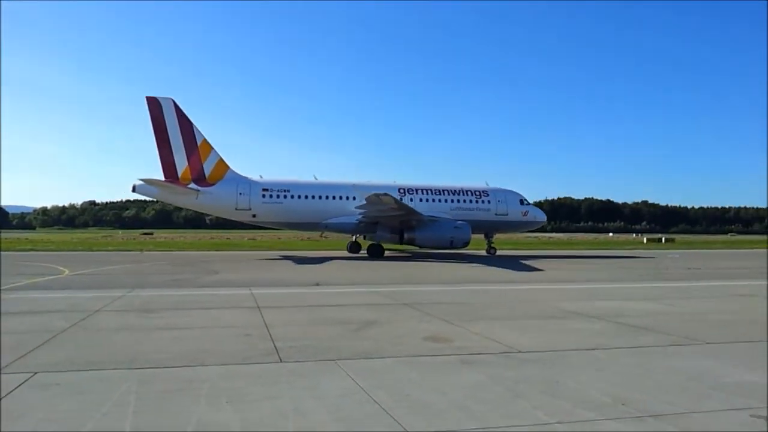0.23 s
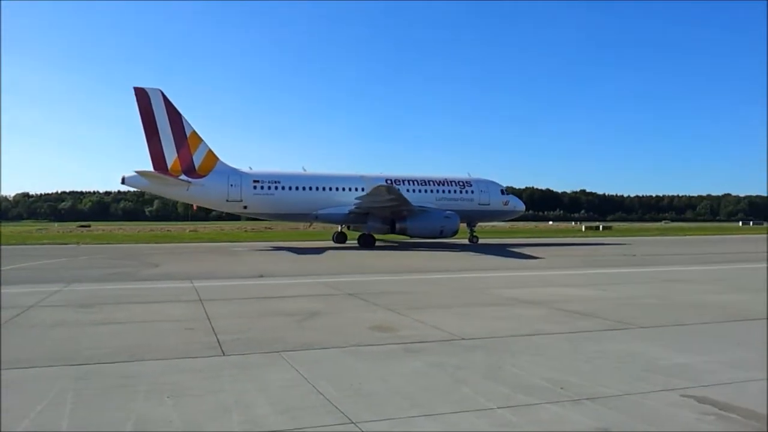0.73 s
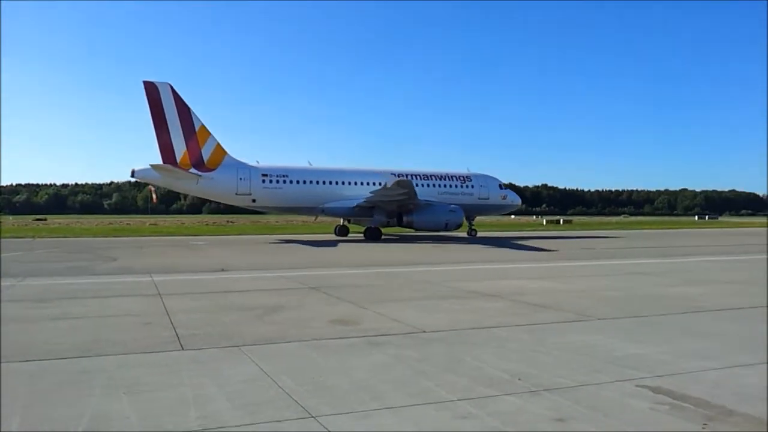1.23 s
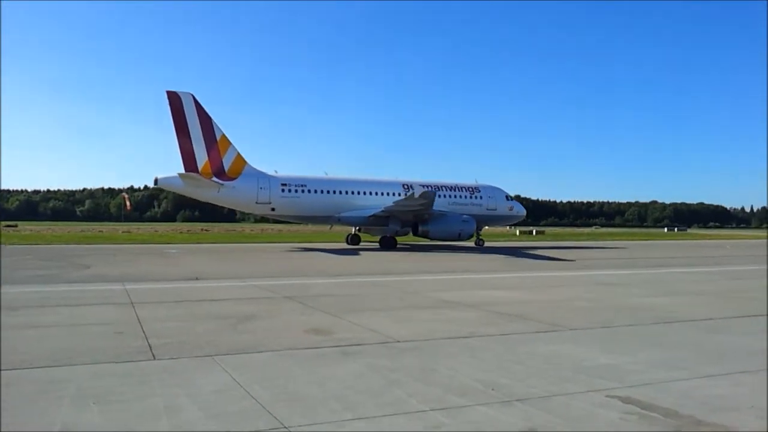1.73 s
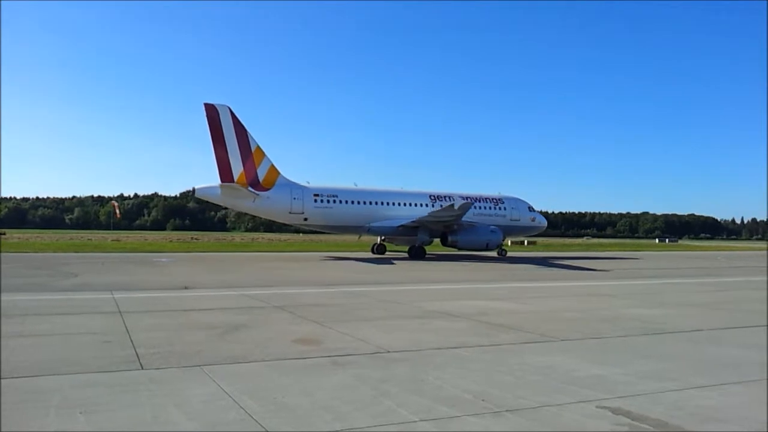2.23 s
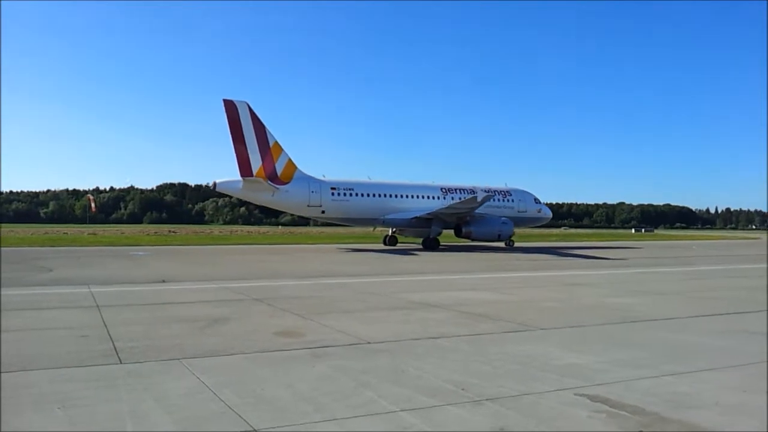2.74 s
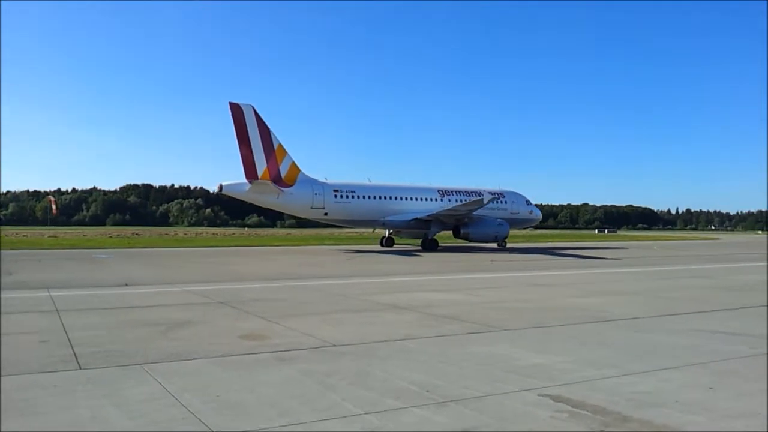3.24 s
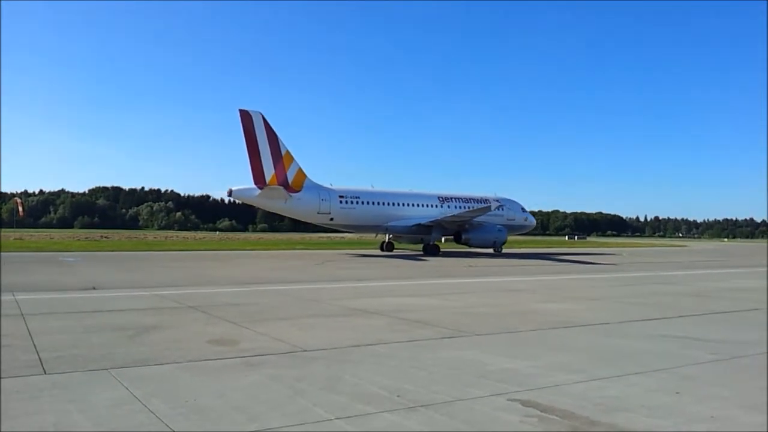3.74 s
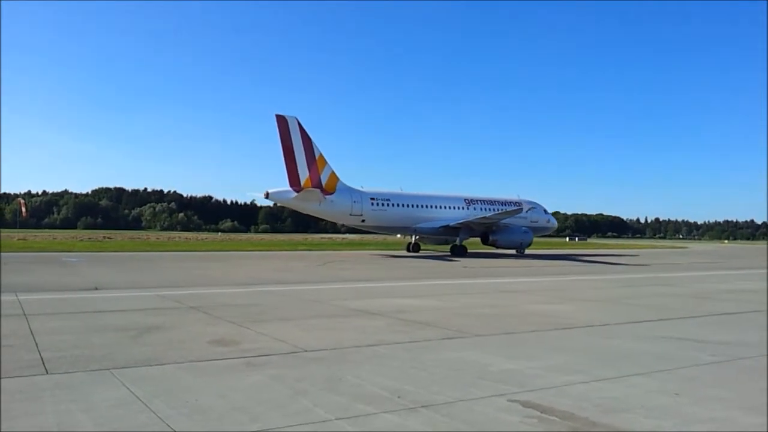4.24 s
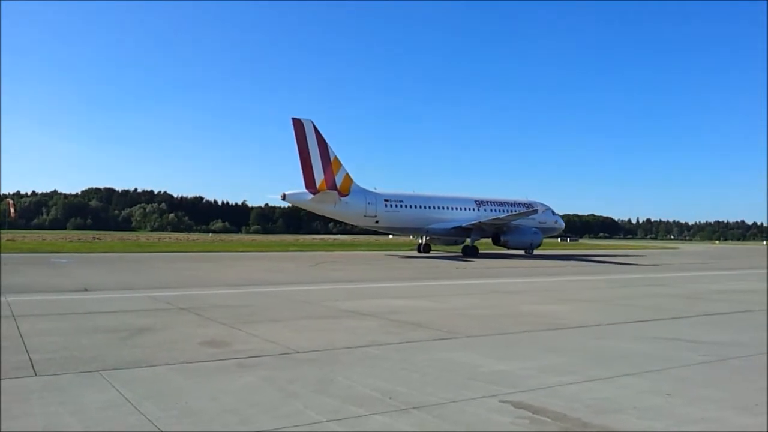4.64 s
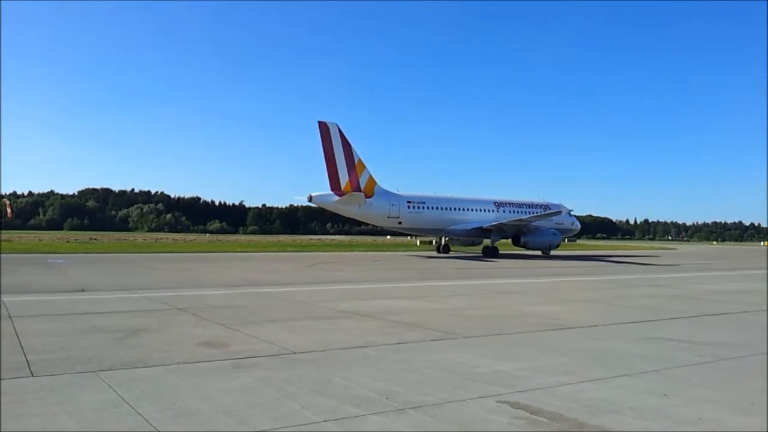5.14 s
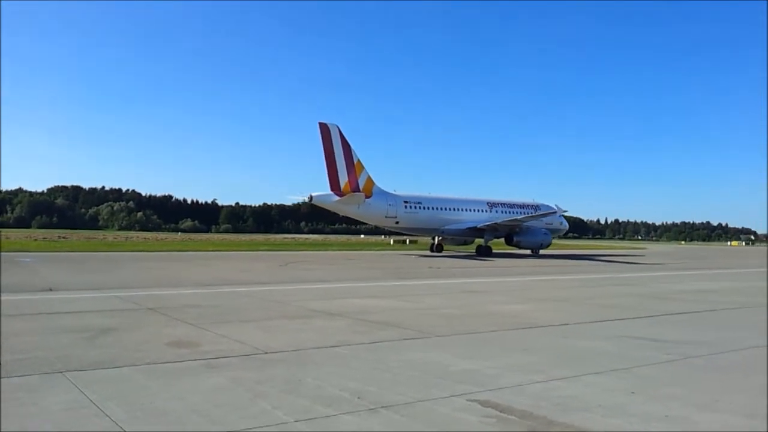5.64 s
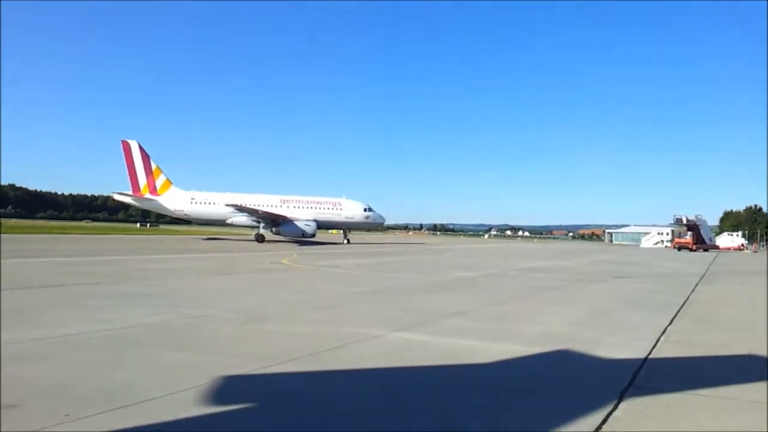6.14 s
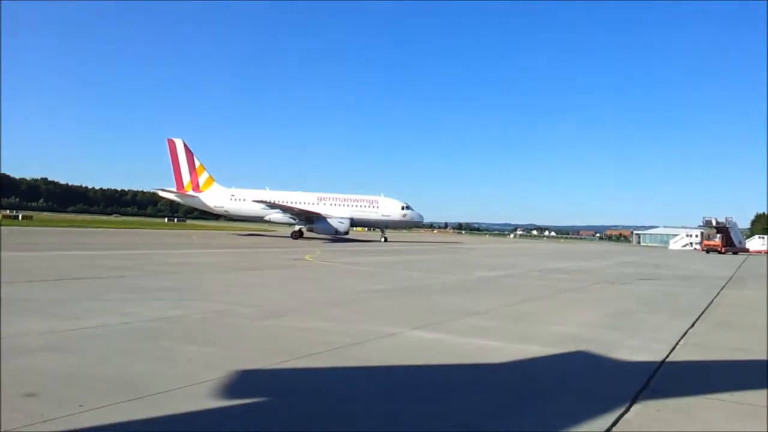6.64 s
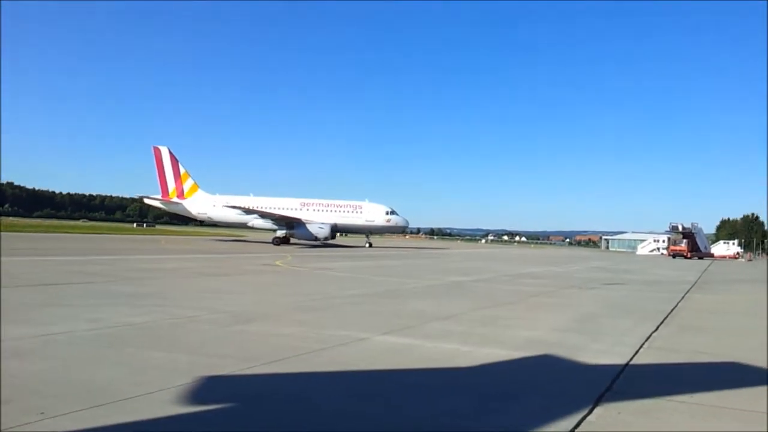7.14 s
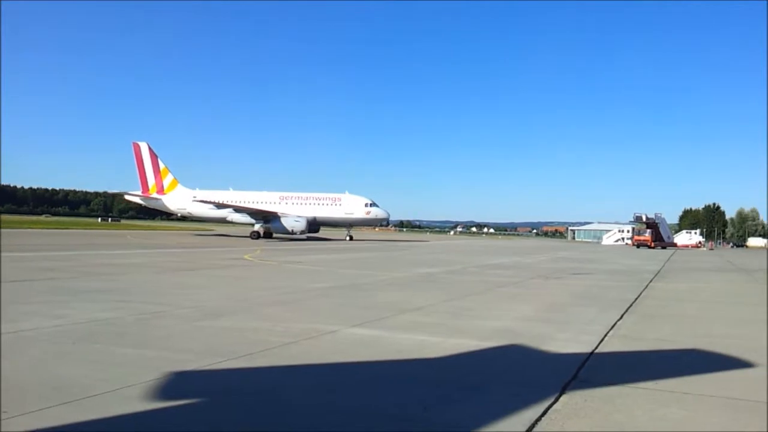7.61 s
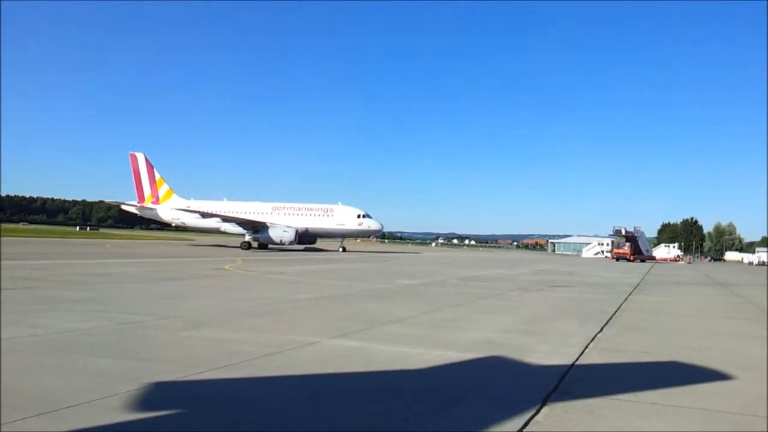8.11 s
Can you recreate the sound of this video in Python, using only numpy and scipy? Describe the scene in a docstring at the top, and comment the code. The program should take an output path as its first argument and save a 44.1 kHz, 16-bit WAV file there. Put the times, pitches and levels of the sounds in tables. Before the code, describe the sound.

A taxiing airliner's jet engines rush and whine steadily across an open apron, then abruptly turn darker and less hissy from a new standpoint.

```python
"""Twin jet engines of a taxiing airliner, heard over an open concrete apron from abeam, then from further ahead.
Exhaust roar, fan rush and intake hiss are shaped noise that wavers in the moving air.
Ducts hum and blade rows whine as partly scattered tones, whose levels follow passing lobes.
Slow pitch changes follow shaft speed and Doppler shift; the standpoint switches once, at 5.753 s."""
import sys
import numpy as np
from scipy import signal
from scipy.io import wavfile
from scipy.ndimage import map_coordinates

SR = 44100
rng = np.random.default_rng(int(sys.argv[2]) if len(sys.argv) > 2 else 0)


def inscribe(sig):
    """Save sig as 16-bit PCM at rate SR to the path in sys.argv[1].

    A 1-D sig is mono; a 2-D sig holds one channel per row.
    Samples are clipped to [-1, 1] before scaling.
    """
    pcm = np.round(np.clip(np.atleast_2d(sig).T, -1, 1) * 32767)
    wavfile.write(sys.argv[1], SR, pcm.astype(np.int16))


N = 369116

SWITCH_S = 5.753  # from abeam before, from ahead after
TOP_HZ = 12200
FRAME = 1024  # samples

# All length_s columns below: full width of a Gaussian swell at 1/e of its height.
# Basic noise spectrum of the engines: frequency_hz, density_db_per_hz, left_minus_right_db, ear_likeness_0_to_1
NEAR_RUSH = [(30, -86, 5.9, 0.55), (90, -68, 1, 0.4), (143, -50, 6.5, 0.93), (418, -48.5, -1, 0.79),
             (750, -47.5, 0.5, 0.86), (860, -54, -1.5, 0.16), (1274, -50, 6, 0.35), (1357, -56.5, 3.5, 0),
             (1826, -50, 8, 0.46), (1990, -54, 3.5, 0), (2480, -54.5, 1.5, 0.07), (3400, -57.5, 1, 0),
             (4330, -54, -1.5, 0.12), (5900, -55, 2.5, 0.36), (7040, -52, 0.5, 0.52),
             (8640, -59.5, -5, 0.03), (10340, -68, -9.5, 0), (11410, -80, -21, 0.1),
             (12600, -108, -22, 0.2)]
FAR_RUSH = [(30, -92, 5, 0.55), (91, -68, 9, 0.69), (171, -48.5, 1, 0.82), (390, -48.5, 3.5, 0.32),
            (600, -52, -1.5, 0.62), (970, -53, 2.5, 0.35), (1050, -62, 0, 0.15), (1230, -58, 1, 0.3),
            (1670, -59.5, 3.5, 0.75), (1980, -57, -1, 0.36), (2430, -63, -3, 0.33), (2880, -62.5, -5, 0.26),
            (4000, -65, 3, 0.091), (4540, -63, 8, 0.25), (5780, -62, -6, 0.31), (7650, -66, -1.5, 0.22),
            (9200, -75.5, -12.5, 0.25), (10110, -76, 0, 0.15), (10860, -107, 0, 0.1)]
# Steady trends of the rush from abeam as the aircraft rolls on, counted from MIDWAY_S
MIDWAY_S = 2.57
ROAR_DB_PER_S, FAN_DB_PER_S, HISS_PAN_DB_PER_S = 0.1, 0.5, -0.07
TOP_DB_PER_S = -1.3  # full slope above 10.5 kHz
# Beamed hiss whose lobe sweeps past once: peak_s, length_s, gain_db
HISS_LOBE = (2.43, 1.6, 1.15)
# Gusts and lulls in the rush: peak_s, length_s, roar_gain_db, fan_gain_db, hiss_gain_db
GUSTS = [(1.306, 0.38, 1.5, -0.7, 1.2), (2.23, 0.27, 1.7, 0, 1.5), (3.562, 0.21, 2.5, -0.5, 0.3),
         (3.9, 0.3, 1, 0.5, 0.5), (4.36, 0.2, 0, 1, 0), (5.223, 0.14, 0, 1.8, 0),
         (5.37, 0.16, -1.5, -0.5, -0.5), (5.53, 0.22, 0, -1.3, 0), (5.725, 0.07, 0, 1.8, -1),
         (6.118, 0.15, 1.5, -0.2, 1), (6.25, 0.06, -2.5, -3, 0), (6.463, 0.17, -4.5, -4.5, -3),
         (6.552, 0.056, 3, 2.5, 1), (6.672, 0.24, -2, -3.5, -3), (7.05, 0.33, 1.9, 0, 0.7),
         (7.22, 0.08, -2, -1.5, -0.5), (7.31, 0.07, 1.6, 0.4, 0.3), (7.41, 0.087, -1.5, -2.5, -1.5),
         (7.48, 0.08, 2, 1, 0.3), (7.62, 0.09, -1.5, 0.5, 0.2), (7.93, 0.31, 1, 1.5, 0.8),
         (8.09, 0.14, -0.5, 0.4, 0.9), (8.26, 0.24, -3, 0.5, -0.5)]
# Random waver of the whole rush: scale in dB above 5 kHz, less below
NEAR_WAVER_DB, FAR_WAVER_DB = .45, .7
# Initial excess of fan rush and hiss from ahead, and its decay time constant
BRIGHT_FAN_DB, BRIGHT_HISS_DB, BRIGHT_S = 2.5, 6, 0.52
# Drift of the hiss between the ears from ahead: time_s, left_minus_right_db
HISS_DRIFT = [(5.8, -1.5), (6.27, 1), (6.68, -3), (7.2, -2.5), (7.7, -0.5), (8.35, 0)]
# Dips and crests sliding through the hiss: start_hz, slide_hz_per_s, width_hz, gain_db
NEAR_RIPPLES = [(2900, -26, 210, -1), (3560, 0, 220, -1.1), (5800, -48, 280, -2), (6280, -32, 200, -0.7),
                (7540, 90, 550, 0.5), (8720, -25, 400, -1.5)]
FAR_RIPPLES = [(4100, 70, 290, 1), (6130, 45, 220, -3.5), (7400, -560, 850, 1.5), (8600, -660, 1100, -3)]
# Bearing of the engines: time_s, left_ear_lag_ms
BEARING = [(0, .22), (1.5, .225), (2.3, .19), (3.2, .165), (4.5, .135), (5.74, .125), (5.77, .23),
           (6.4, .15), (8.37, .143)]
# Brief narrowing of the hiss to the centre: start_s, end_s, depth_0_to_1
NARROWINGS = [(.14, .76, .9), (2.56, 2.87, .8), (3.15, 3.46, .35)]
# Main tones, in the order of TONE_LEVELS: pitch_hz, nominal_width_hz, steady_power_share_0_to_1,
# ear_likeness_0_to_1, abeam_left_minus_right_db, ahead_left_minus_right_db
VOICES = [(155.8, 11, .87, .95, 3, 3), (266.8, 14, .8, .95, 1.5, 1.5), (375.5, 9, .97, .93, 1, 1),
          (1204, 34, .8, .8, 4, 1), (1876, 14, .75, .6, 5.5, 0), (1920, 20, .87, .7, 9.5, -1),
          (2141, 20, .76, .7, 2, -1), (2184.5, 20, .78, .7, 1, -2)]
# Resting levels before the common gain, by tone name: abeam_level_db, ahead_level_db
TONE_LEVELS = {"drone": (-30.5, -38.5), "middle hum": (-29.5, -48), "hum": (-32.5, -32),
               "howl": (-31, -45.5), "side whine": (-39, -57), "first whine": (-35, -34),
               "second whine": (-34.5, -43), "third whine": (-32.5, -33.5)}
# Lobes and gaps of the main tones sweeping past: tone_name, peak_s, length_s, gain_db
LOBES = [("drone", 0.23, 0.44, -5), ("drone", 0.72, 0.3, 3), ("drone", 3.3, 3.3, 3.6),
         ("drone", 6.55, 0.14, 9), ("drone", 7.3, 0.7, 6.9), ("middle hum", 2.42, 0.32, 2.3),
         ("hum", 1.26, 0.27, 9.1), ("hum", 1.88, 0.35, 11.5), ("hum", 2.86, 0.23, 9.4),
         ("hum", 4.12, 1.05, 6.3), ("hum", 5.6, 0.21, 4.3), ("hum", 6.3, 0.23, 7), ("hum", 6.9, 0.51, 8.9),
         ("hum", 7.42, 0.46, 10), ("hum", 7.91, 0.59, 11.3), ("howl", 1.4, 0.17, -5),
         ("howl", 2.23, 1.4, 6.7), ("howl", 3.12, 0.27, 2.7), ("howl", 3.36, 0.2, 7.7),
         ("howl", 3.55, 0.1, -3), ("howl", 3.5, 0.2, 5), ("howl", 4.03, 0.15, 3), ("howl", 4.53, 1.6, 8.3),
         ("howl", 5.17, 0.38, 5.3), ("howl", 5.43, 0.2, -2.5), ("howl", 5.72, 0.16, 7.2),
         ("side whine", 0.75, 1.1, 13), ("side whine", 1.77, 1.4, 10), ("first whine", 0.41, 1.55, 13.5),
         ("first whine", 1.53, 1.15, 12), ("first whine", 2.1, 0.4, 5), ("first whine", 2.45, 0.26, 8.4),
         ("first whine", 3.1, 0.7, 8.3), ("first whine", 4.48, 0.18, 8), ("first whine", 6.22, 0.29, 8.2),
         ("first whine", 6.98, 0.37, 5), ("first whine", 7.5, 0.3, 4.5), ("first whine", 7.87, 0.25, 3.5),
         ("second whine", 0.39, 1.3, 11.4), ("second whine", 1.17, 0.21, 5),
         ("second whine", 2.9, 0.5, 4.5), ("second whine", 4.7, 1.1, 9.8), ("second whine", 6.7, 1.2, 11),
         ("third whine", 2.1, 0.3, 4.9), ("third whine", 3.16, 1.3, 5.6), ("third whine", 6.13, 0.26, 8.5),
         ("third whine", 6.6, 0.4, 2.5), ("third whine", 8.2, 0.4, 2)]
# Slow level beat of the two engines from abeam, by tone name: peak_s, period_s, swing_either_way_db
BEATS = {"drone": (3.09, 1.4, 3.2)}
# Random pitch jitter of the howl: scale_hz, random_knots_per_s
HOWL_WANDER = (8, 21)
# Random level twinkle of the main tones: scale in dB at 2 kHz, proportional to frequency; knots per s
NEAR_TWINKLE_DB, FAR_TWINKLE_DB, TWINKLE_RATE = 1.1, 2.2, 15
# Heard pitch, from shaft speed and Doppler shift: time_s, first_whine_hz
PITCH = [(0, 1927), (.5, 1922), (1.1, 1919), (2.4, 1916), (4.2, 1913.5), (5.74, 1915), (5.76, 1927),
         (6.6, 1929), (8.37, 1930)]
WHINE_HZ = 1920  # reference for all pitches
# Upper side line beating with the first whine: pitch_hz, level_relative_to_whine_db
SIDE_LINES = [(1964, -15)]
# Compressor whistles beamed from the intakes as the aircraft turns: peak_s, length_s, pitch_hz, level_db, width_hz
WHISTLES = [(3.2, 1.2, 4350, -40, 10), (4.6, 2.5, 2735, -41, 20), (4.1, 3.4, 3176, -39, 4),
            (4.4, 2.2, 4828, -40, 5), (4.7, 1.6, 5796, -37, 4), (3.9, 2.6, 5915, -38, 4),
            (7.3, .6, 1482, -41, 30), (7.55, .7, 2568, -43, 12), (7.1, .6, 6540, -45, 30),
            (7.6, .9, 5490, -45, 30), (7.9, .9, 4860, -45, 30)]
# Swells of duct notes: peak_s, length_s, pitch_hz, level_db
SURGES = [(4.676, 0.63, 487, -31.5), (5.194, 0.11, 402.4, -24.5), (5.69, 0.1, 493, -20.5)]
# Weaker duct and blade lines, before their common gain: pitch_hz, level_db, nominal_width_hz
NEAR_LINES = [(110, -49, 6), (197, -40, 6), (436, -38, 8), (800, -40, 10), (4828, -42, 30), (6304, -44, 25)]
FAR_LINES = [(107.5, -46, 3), (197, -41, 4), (217, -39, 4), (263.5, -30.5, 5), (312.5, -33.5, 4),
             (486, -39, 8), (750, -41, 5), (1131, -45, 10), (1455, -45, 25), (1490, -45, 25),
             (2568, -43, 12), (2730, -47, 20), (4752, -49, 8), (4842, -47, 16), (5832, -45, 25),
             (5940, -49, 10), (6342, -49, 12)]


def rush(spectrum, swell, colour, mix_db, hiss_side_db, waver_db, flicker_db):
    """Turbulent mixing gives broadband noise; eddies on the path modulate each octave separately."""
    noise = rng.standard_normal((2, N))
    hz, t, (common, own) = signal.stft(noise, SR, nperseg=FRAME, noverlap=FRAME * 3 // 4)
    points_hz, *columns = np.transpose(spectrum)
    db, pan_db, likeness = (across(hz, points_hz, c) for c in columns)

    *swells_db, hiss_pan_db = swell(t)
    roar_db, fan_db, hiss_db = np.array(swells_db) + np.array(mix_db)[:, None]
    roar = across(hz, [750, 1050], [1, 0])
    hiss = across(hz, [3600, 4800], [0, 1])
    fan = 1 - roar - hiss
    db = db + roar * roar_db + fan * fan_db + hiss * hiss_db + colour(hz, t)

    # short waves are scattered most
    octaves_hz = np.geomspace(300, 10000, num=6)
    eddies = sum(across(hz, octaves_hz, band) * walk(t, rate=15) for band in np.eye(len(octaves_hz)))
    scattering = across(hz, [300, 5000], [.4, 1])
    db = db + scattering * (waver_db * walk(t, rate=20) + flicker_db * eddies)

    pan_db = pan_db + hiss * (hiss_side_db + hiss_pan_db)
    coherence = ear_coherence(hz, t, np.clip(likeness, 0, .98))
    right = coherence * common + np.sqrt(1 - abs(coherence) ** 2) * own
    ears = np.array([common * undb(db + pan_db / 2), right * undb(db - pan_db / 2)])
    sound = signal.istft(ears, SR, nperseg=FRAME, noverlap=FRAME * 3 // 4)[1][:, :N]
    return np.sqrt(SR / 2) * sound  # scales the noise to power per Hz


def near_swell(t):
    """Directivity from abeam: gains in dB of roar, fan and hiss, and hiss pan, as the aircraft rolls on."""
    rolled_s = t - MIDWAY_S
    roar, fan, hiss = gusts(t)
    lobe_s, lobe_length_s, lobe_db = HISS_LOBE
    roar = roar + ROAR_DB_PER_S * rolled_s
    fan = fan + FAN_DB_PER_S * rolled_s
    hiss = hiss + lobe_db * bump(t, lobe_s, lobe_length_s)
    return roar, fan, hiss, HISS_PAN_DB_PER_S * rolled_s


def far_swell(t):
    """Exponential decay from ahead: fan and hiss start bright and die back while the hiss pan drifts."""
    roar, fan, hiss = gusts(t)
    bright = np.exp(-np.maximum(t - SWITCH_S, 0) / BRIGHT_S)
    return roar, fan + BRIGHT_FAN_DB * bright, hiss + BRIGHT_HISS_DB * bright, curves(HISS_DRIFT, t)[0]


def gusts(t):
    """Convection by moving air raises or lowers roar, fan rush and hiss, in decibels."""
    return sum(np.outer(gains_db, bump(t, s, length)) for s, length, *gains_db in GUSTS)


def near_colour(hz, t):
    """Spectral change from abeam: the top of the hiss dulls with time while ripples slide, in decibels."""
    dulling = across(hz, [8000, 10500], [0, 1]) * TOP_DB_PER_S * (t - MIDWAY_S)
    return dulling + ripples(NEAR_RIPPLES, hz, t)


def far_colour(hz, t):
    """Spectral change from ahead: ripples slide through the hiss, in decibels."""
    return ripples(FAR_RIPPLES, hz, np.maximum(t - SWITCH_S, 0))


def ripples(table, hz, since_s):
    """Moving spectral dips and crests: Gaussian gains in decibels slide as the bearing changes."""
    return sum(db * bump(hz[:, None], start_hz + slide * since_s, width)
               for start_hz, slide, width, db in table)


def main_tones(turns, t, gain_db):
    """Duct resonance and blade passing give tones; directivity lobes make them swell and sink."""
    near = t < SWITCH_S
    levels = {name: np.where(near, near_db, far_db) for name, (near_db, far_db) in TONE_LEVELS.items()}
    for name, s, length, db in LOBES:
        levels[name] = levels[name] + db * beam(t, s, length)
    for name, (s, period, db) in BEATS.items():
        levels[name] = levels[name] + near * db * np.cos(2 * np.pi * (t - s) / period)
    wander_hz, wander_rate = HOWL_WANDER
    out = 0
    for (name, db), voice in zip(levels.items(), VOICES):
        hz, width, steady, likeness, near_pan, far_pan = voice
        # the howl is no blade tone, and its pitch jitters
        wander = np.cumsum(wander_hz / hz * walk(t, rate=wander_rate)) / SR if name == "howl" else 0
        twinkle_scale_db = np.where(near, NEAR_TWINKLE_DB, FAR_TWINKLE_DB) * hz / 2000
        twinkle_db = twinkle_scale_db * walk(t, rate=TWINKLE_RATE)
        pan_db = np.where(near, near_pan, far_pan)
        out = out + undb(db + twinkle_db) * tone(turns + wander, hz, width, steady, pan_db, likeness)
    # the side line radiates sideways, so it is heard only from abeam
    for hz, db in SIDE_LINES:
        line = tone(turns, hz, width_hz=13, steady=0.51, pan_db=8.0, likeness=0.58)
        out = out + near * undb(levels["first whine"] + db) * line
    return undb(gain_db) * out


def whistles(turns, t):
    """Directional radiation: narrow beams of compressor tone sweep across the listener."""
    return sum(undb(db) * beam(t, s, length)
               * tone(turns, hz, width, steady=0.95, pan_db=-2, likeness=0.54)
               for s, length, hz, db, width in WHISTLES)


def surges(turns, t):
    """Duct resonance: single notes swell and fade under Gaussian envelopes."""
    return sum(undb(db) * bump(t, s, length)
               * tone(turns, hz, width_hz=16, steady=1.0, pan_db=2, likeness=.9)
               for s, length, hz, db in SURGES)


def weak_lines(turns, lines, gain_db):
    """Duct and compressor stage lines; interaural likeness falls as frequency rises."""
    return sum(undb(db + gain_db)
               * tone(turns, hz, width, steady=0.58, pan_db=1.0, likeness=1 / (1 + (hz / 1400) ** 2))
               for hz, db, width in lines)


def tone(turns, hz, width_hz, steady, pan_db, likeness):
    """Scattering by turbulence: a steady core plus a fluctuating part that differs between the ears."""
    steady, likeness = np.clip([steady, likeness], 0, 1)
    left = flutter(width_hz)
    right = likeness * left + np.sqrt(1 - likeness ** 2) * flutter(width_hz)
    body = np.sqrt(steady) + np.sqrt(1 - steady) * np.array([left, right])
    body[0] *= np.exp(-1j * ear_phase(np.array([hz]), np.arange(N) / SR)[0])
    wave = np.sqrt(2) * (body * np.exp(2j * np.pi * hz * turns)).real
    return wave * undb(np.array([[.5], [-.5]]) * pan_db)


def flutter(width_hz):
    """Random modulation broadens a line: a complex amplitude of mean power 1."""
    rate = 500  # knots per s
    hz = np.fft.fftfreq(8192, 1 / rate)
    white = rng.standard_normal((len(hz), 2)) @ [1, 1j]
    z = np.fft.ifft(np.fft.fft(white) / (1 + (hz / (.75 * width_hz)) ** 2))
    z = np.interp(np.arange(N) / SR, np.arange(len(z)) / rate, z)
    return z / np.sqrt(np.mean(abs(z) ** 2))


def ear_phase(hz, t):
    """Interaural delay: radians by which the left ear lags; the bass arrives together."""
    lag_s = curves(BEARING, t)[0] / 1000
    mids = across(hz, [850, 1400, 4500], [0, 1, 0])
    treble = across(hz, [1400, 4500], [0, 1])
    mid_share = np.where(t < SWITCH_S, .6, 1.2)
    return 2 * np.pi * hz[:, None] * lag_s * (mids * mid_share + treble)


def ear_coherence(hz, t, likeness):
    """Interaural coherence, complex; at times the hiss narrows to the centre."""
    narrow = sum(np.interp(t, [start - .04, start + .04, end - .04, end + .04], [0, depth, depth, 0])
                 for start, end, depth in NARROWINGS)
    narrow = narrow * across(hz, [4300, 4700, 7500, 10000], [0, 1, 1, 0])
    return (1 - narrow) * likeness * np.exp(1j * ear_phase(hz, t)) + narrow


def beam(t, peak_s, length_s):
    """Directivity lobe sweeping past, heard from one of the two standpoints only."""
    return bump(t, peak_s, length_s) * ((t < SWITCH_S) == (peak_s < SWITCH_S))


def bump(x, peak, length):
    """Gaussian rise and fall of height 1."""
    return np.exp(-(2 * (x - peak) / length) ** 2)


def walk(t, rate):
    """Random fluctuation: a smooth curve through normal knots, rate of them per second."""
    knots = rng.standard_normal(int(N / SR * rate) + 4)
    return map_coordinates(knots, [t * rate + rng.random()], order=3, mode="nearest")


def curves(table, t):
    """Linear interpolation in time of each column after the first."""
    s, *columns = np.transpose(table)
    return [np.interp(t, s, c) for c in columns]


def across(hz, points_hz, values):
    """Linear interpolation over log frequency, as a column."""
    return np.interp(np.log(hz + 1), np.log(points_hz), values)[:, None]


def undb(db):
    """Logarithmic level: decibels to amplitude gain."""
    return 10 ** (np.asarray(db) / 20)


def scene():
    """Superposition of noise and tones of the same engines, from one standpoint and then the other."""
    t = np.arange(N) / SR
    turns = np.cumsum(curves(PITCH, t)[0] / WHINE_HZ) / SR  # engine time: all tones glide together
    near = rush(NEAR_RUSH, near_swell, near_colour, mix_db=(0.5, 0.45, -0.5), hiss_side_db=0.5,
                waver_db=NEAR_WAVER_DB, flicker_db=0.23)
    near = near + whistles(turns, t) + surges(turns, t) + weak_lines(turns, NEAR_LINES, gain_db=0.4)
    far = rush(FAR_RUSH, far_swell, far_colour, mix_db=(-0.6, 0.8, -1.1), hiss_side_db=0.6,
               waver_db=FAR_WAVER_DB, flicker_db=0.43)
    far = far + weak_lines(turns, FAR_LINES, gain_db=-1.1)
    return np.where(t < SWITCH_S, near, far) + main_tones(turns, t, gain_db=0.14)


def record(dry):
    """Amplitude limiting clips peaks beyond 0.92, then a steep low-pass filter removes the top."""
    clipped = np.clip(dry, -.92, .92)
    lowpass = signal.ellip(8, .2, 80, TOP_HZ, fs=SR, output="sos")
    return signal.sosfilt(lowpass, clipped)


dry = scene()
out = record(dry)
inscribe(out)
```